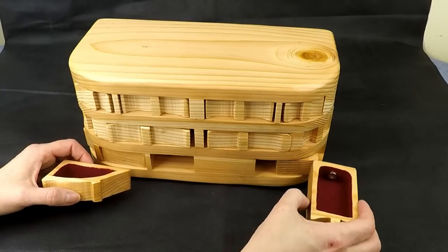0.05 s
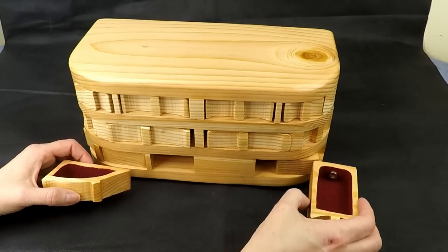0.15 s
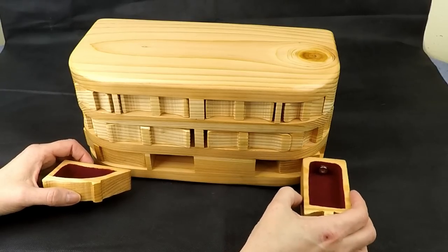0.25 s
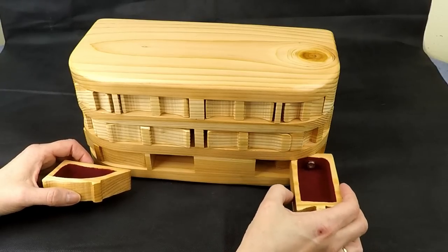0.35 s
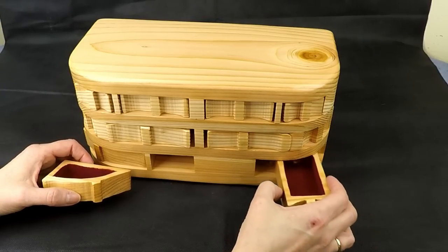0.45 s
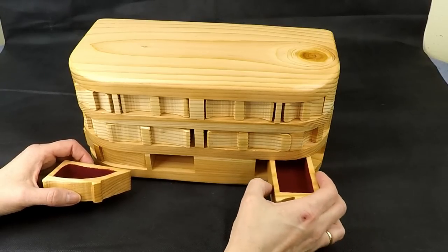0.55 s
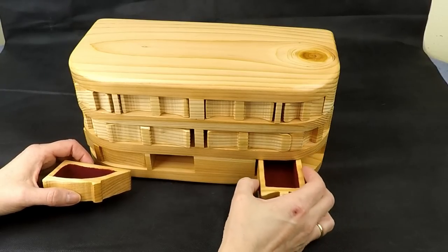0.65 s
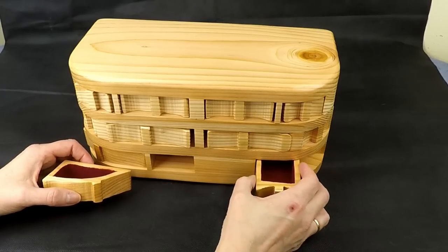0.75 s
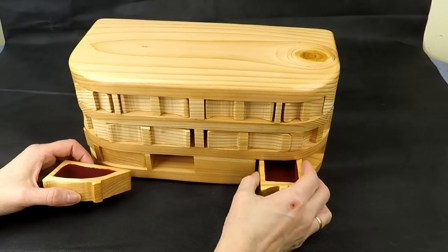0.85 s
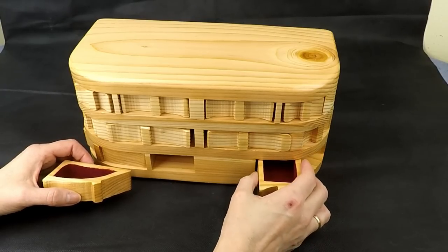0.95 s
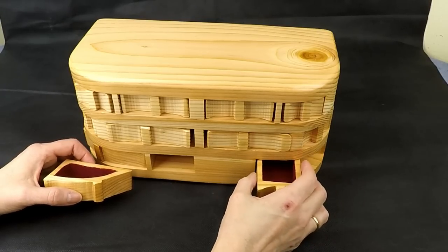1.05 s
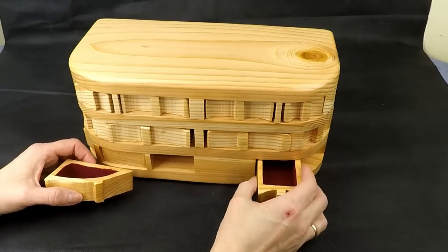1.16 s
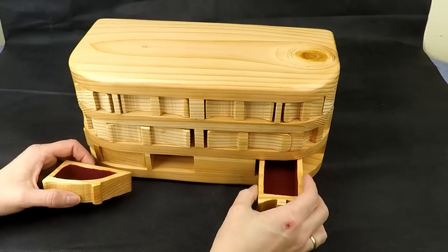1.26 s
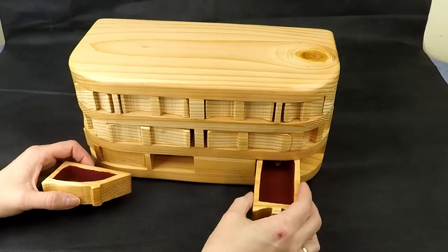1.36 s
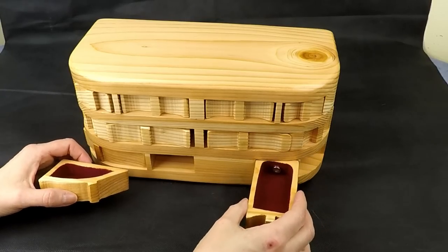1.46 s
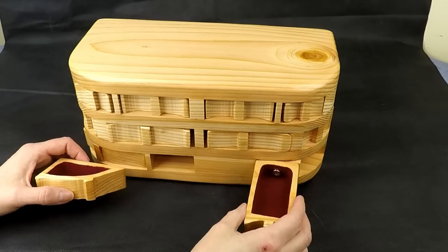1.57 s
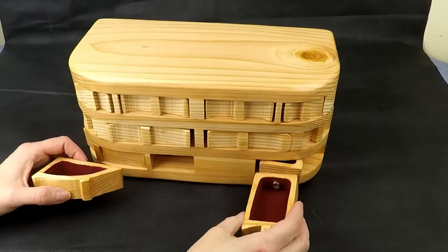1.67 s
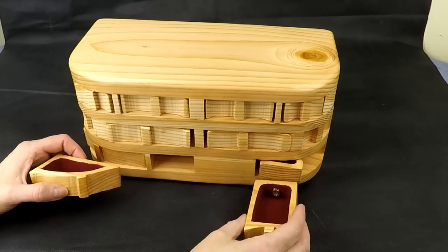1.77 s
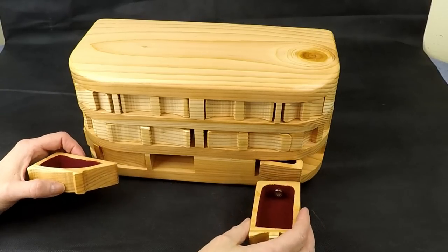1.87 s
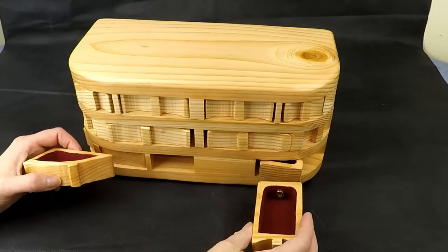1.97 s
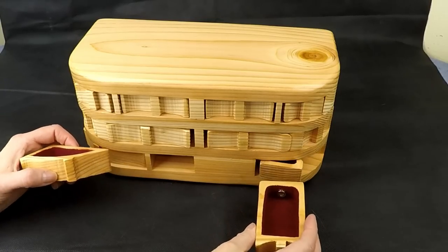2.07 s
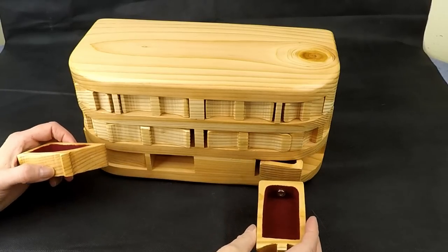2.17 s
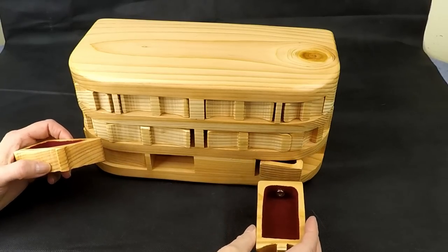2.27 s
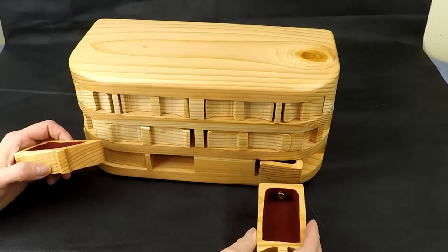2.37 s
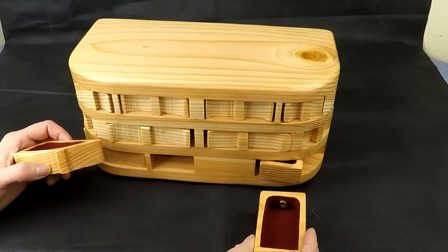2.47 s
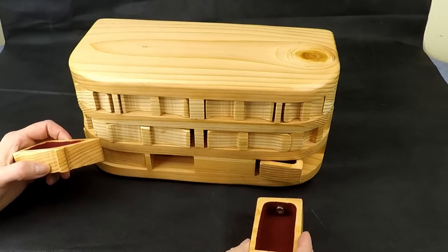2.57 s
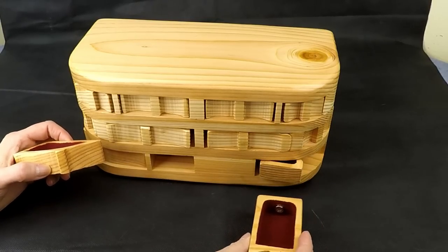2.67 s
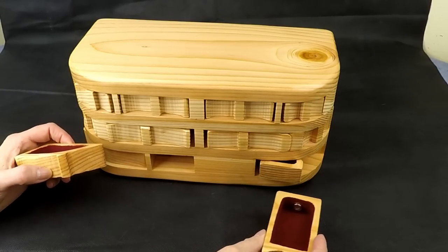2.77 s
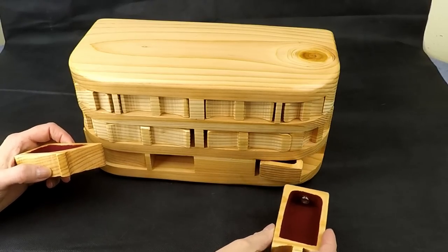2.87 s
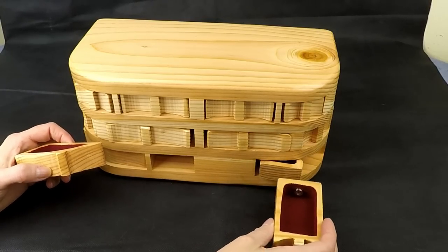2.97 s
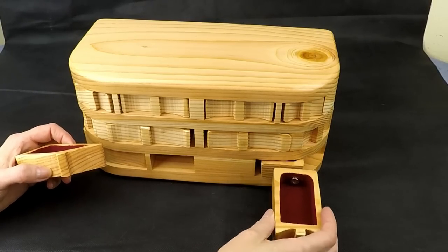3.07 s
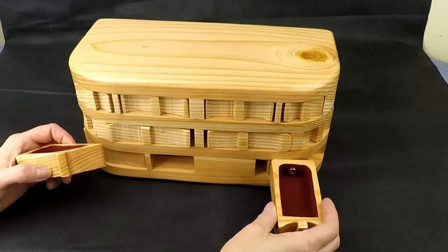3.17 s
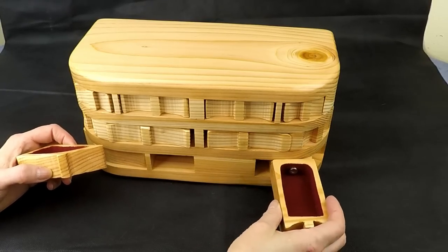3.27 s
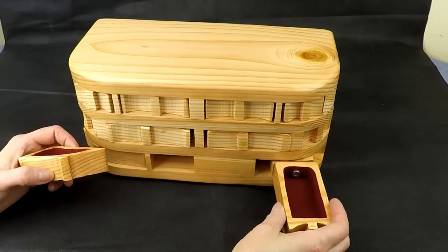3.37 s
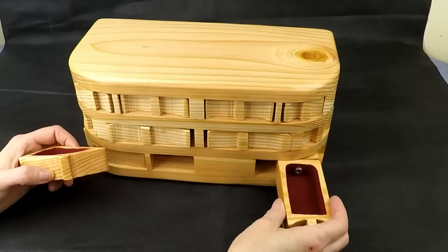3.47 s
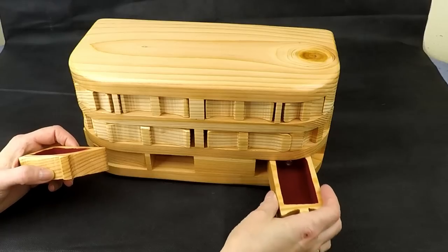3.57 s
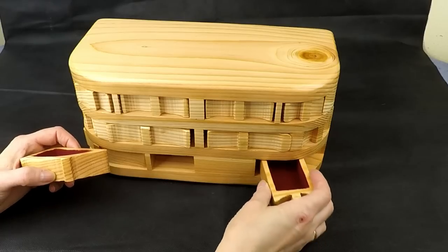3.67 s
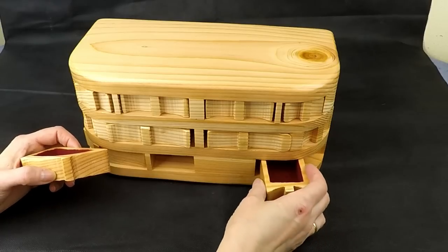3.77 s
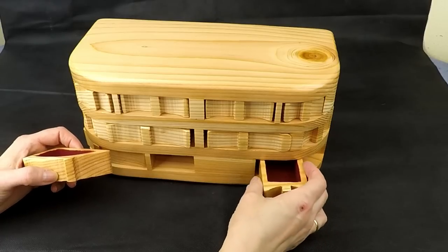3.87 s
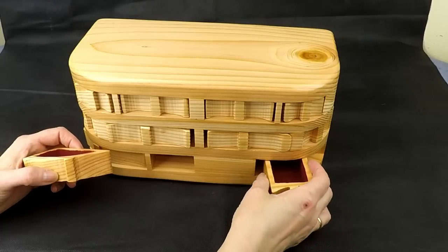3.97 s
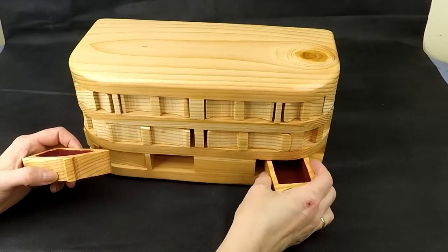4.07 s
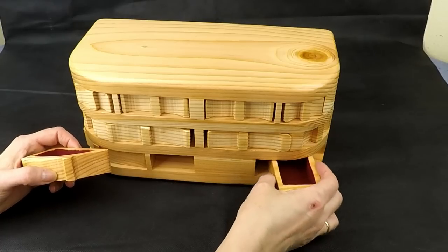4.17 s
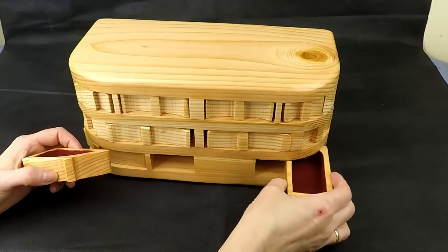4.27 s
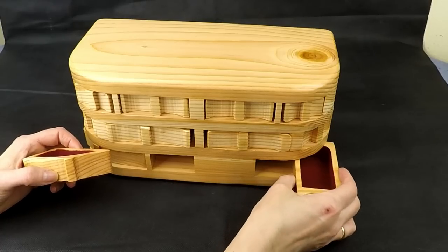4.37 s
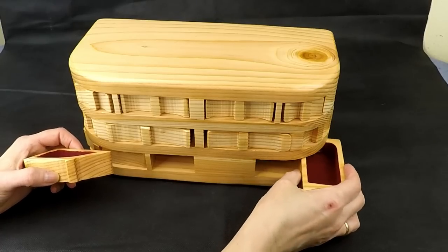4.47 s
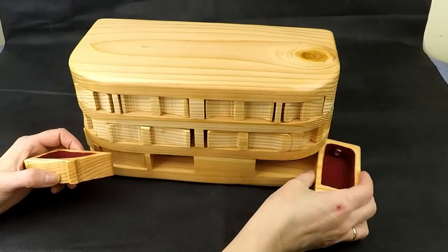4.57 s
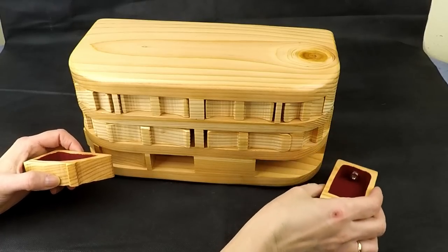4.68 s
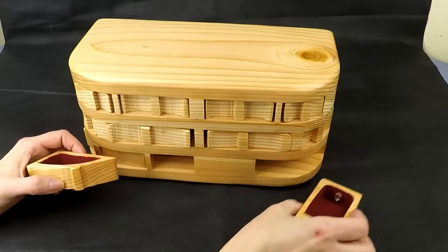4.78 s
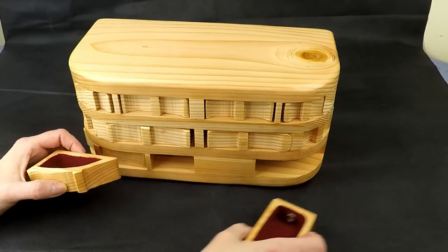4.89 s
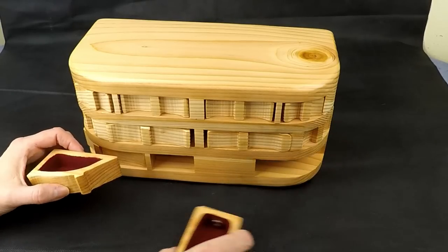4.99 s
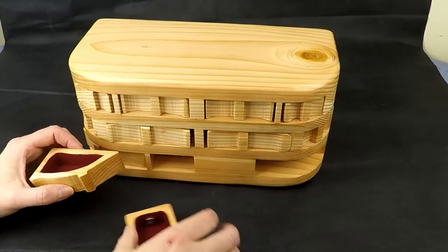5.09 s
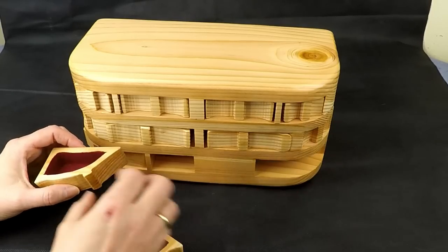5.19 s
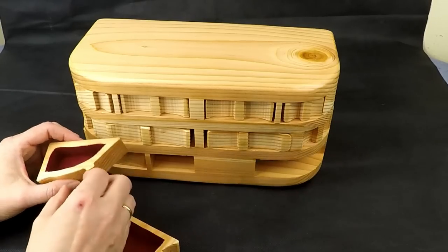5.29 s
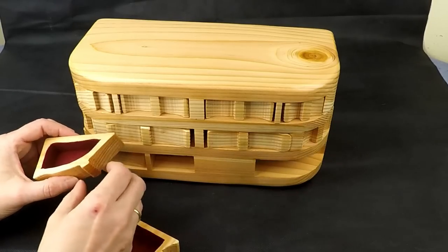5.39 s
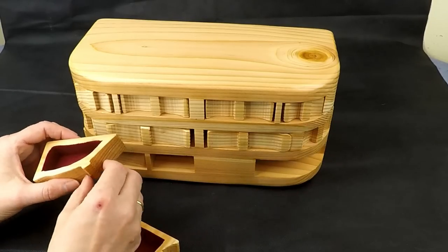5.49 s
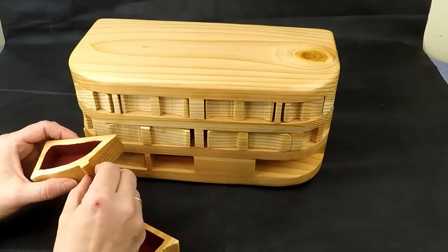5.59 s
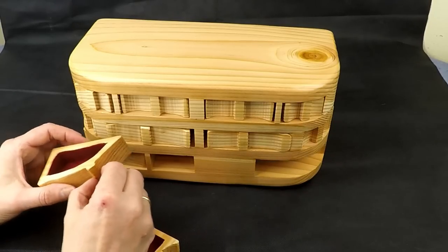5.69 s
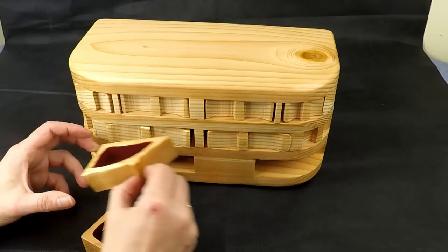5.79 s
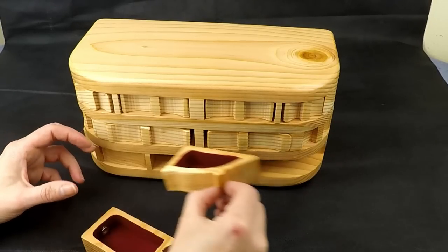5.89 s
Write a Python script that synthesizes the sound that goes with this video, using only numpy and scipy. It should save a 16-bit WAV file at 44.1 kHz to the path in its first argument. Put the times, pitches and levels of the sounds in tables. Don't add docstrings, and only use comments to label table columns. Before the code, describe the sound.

Close, dry handling of a small wooden drawer at a hollow pine chest on a cloth-covered table, with soft dark microphone hiss throughout. From about 0.1 s it goes in with uneven scrapes, small ticks and hollow knocks, the hardest clacks near 0.46 and 0.62-0.65 s, then lighter taps until 1 s. Between 1.15 and 1.7 s it is drawn out with a smoother, slightly humming rub and a few knocks. A near-silent gap follows, with only faint cloth rustle. At 3.07 s a sharp clack starts a second, louder push: dense rattles and scrapes, peaking at 3.65-3.69 s, with low table thumps and another hard knock at 3.96 s. A brisk pull scrapes from 4.18 to 4.6 s. Cloth rustles around 4.8 s, a soft table thud at 5.0 s, a bright short metal clink at 5.26 s, and faint metallic scratches near 5.53 s. Very little room echo.

```python
import sys
import numpy as np
from scipy import signal
from scipy.fft import rfft, irfft, next_fast_len
from scipy.io import wavfile
from scipy.ndimage import uniform_filter1d

SR = 44100
rng = np.random.default_rng(int(sys.argv[2]) if len(sys.argv) > 2 else 0)


def voltage_ratio(decibels):
    exponent = np.asarray(decibels, float) / 20
    return 10 ** exponent


def int16_out(signal):
    q = np.round(np.clip(np.atleast_2d(signal).T, -1, 1) * 32767)
    wavfile.write(sys.argv[1], SR, q.astype(np.int16))


N = 261674

# frequency in Hz, width in Hz, level in dB.
WOOD_MODES = [(646, 113, 1), (793, 23.5, -3.5), (1077.5, 40, -3.5), (1510, 106, -4), (1680, 48, 0),
              (2030, 77, 0.5), (2575, 38, -2), (2770, 62, -3), (3220, 170, -5.5), (3853, 93, -9.5),
              (4350, 69, -9.5), (5120, 180, -12.5), (6230, 160, -16.5), (7060, 440, -13.5)]
MODE_GROUPS = np.array([[1350, 2300], [400, 1350], [2300, 4600], [4600, 12000]])

# start in seconds, length in seconds, middle modes in dB,
# cavity share in dB, bright share in dB.
FIRST_PUSH = [(0.13, 0.11, -66, 17, -3), (0.195, 0.029, -40, 3.5, 3.5), (0.24, 0.012, -36, 2.5, -17),
              (0.272, 0.093, -40.5, -12, 2.5), (0.325, 0.01, -44.5, 13, 4), (0.36, 0.045, -47, 14, -12),
              (0.405, 0.044, -36.5, 4, -1.5), (0.475, 0.0087, -27, -21, 1), (0.505, 0.063, -41.5, 3, 3),
              (0.59, 0.016, -28, -5.5, -1.5), (0.622, 0.019, -32, 2, -2), (0.645, 0.0069, -26, 12.5, -11),
              (0.67, 0.093, -33.5, -3, -5.5), (0.74, 0.031, -38, -1, 3), (0.8, 0.055, -60, -3, -11),
              (0.88, 0.078, -53, 8, 4)]
FIRST_PULL = [(1.151, 0.084, -42, 0.5, -8), (1.193, 0.11, -41.5, -0.5, -8), (1.25, 0.057, -38, -10, -11),
              (1.311, 0.1, -38.5, -3, -8.5), (1.42, 0.038, -45.5, 2, 0), (1.46, 0.03, -46.5, 3, -5),
              (1.5, 0.03, -54, 8, -4), (1.542, 0.06, -53.5, 5.5, -5), (1.599, 0.022, -38, -1.5, -11),
              (1.634, 0.014, -34.5, -1, -7), (1.664, 0.0064, -39.5, 0, 6.5), (1.69, 0.026, -61, 3, -5)]
SECOND_PUSH = [(3.08, 0.049, -34, -7, -7), (3.14, 0.034, -40.5, 9.5, 4), (3.17, 0.04, -34.5, -14, -12),
               (3.29, 0.013, -58, 24, -4), (3.382, 0.028, -35.5, 2, -14), (3.451, 0.0055, -33.5, 1, -5),
               (3.472, 0.013, -29.5, 2, -1.5), (3.494, 0.059, -22.5, -3.5, -3.5),
               (3.565, 0.072, -29.5, 0.5, -4), (3.601, 0.027, -25.5, -1.5, 1.5), (3.66, 0.043, -22, 4, 0),
               (3.699, 0.036, -37, 14.5, 10), (3.735, 0.025, -37.5, 5, 3), (3.91, .03, -48, -6, -17),
               (3.948, 0.013, -29.5, -11, 1), (3.976, 0.032, -29.5, 0.5, -23), (4.01, 0.047, -47, 0, 0),
               (4.07, 0.039, -49, 0, 1)]
SECOND_PULL = [(4.176, 0.042, -26, -10, -5), (4.214, 0.041, -22, -22, -11.5),
               (4.266, 0.031, -25.5, -8, -10), (4.31, 0.062, -31.5, -8.5, -10),
               (4.385, 0.081, -29, -12, -12), (4.503, 0.023, -27, -7, -8.5),
               (4.535, 0.034, -26.5, -8.5, -6), (4.578, 0.037, -27.5, -10, -10.5)]
# time in seconds, resonance in Hz.
SLOT_AIR = [(1.15, 1700), (1.5, 1690), (1.6, 1590), (1.66, 1680), (4.18, 1660), (4.25, 1670), (4.3, 1636),
            (4.37, 1500), (4.46, 1580), (4.5, 1710), (4.62, 1630)]
# time in seconds, resonance in Hz.
DRAWER_HUM = [(1.15, 700), (1.3, 710), (1.36, 775), (1.62, 708), (4.2, 800), (4.3, 794), (4.45, 790),
              (4.55, 754), (4.62, 650)]
# start in seconds, length in seconds, share in dB.
BOTTOM_PANEL = [(1.15, 0.15, -3), (1.38, 0.12, 1.5), (1.6, 0.065, -3), (4.18, 0.093, -2),
                (4.51, 0.081, -2.5)]

# time in seconds, peak in dB, cavity share in dB,
# bright share in dB, low ring of the spot in Hz.
ON_FLOOR = [(0.787, -15.5, 5, -30, 744), (0.932, -11.5, -1.5, -25, 835), (3.223, -14, 5, -11, 890),
            (3.753, -13, -4, -13, 1200), (4.471, -15.5, 13, -34, 830)]
ON_FRONT = [(0.233, -14.5, 6, -4, 467), (0.271, -17, 4, -3, 1060), (0.338, -11.5, 10, -6, 830),
            (0.388, -12.5, 14, -14, 814), (0.59, -15, 8, -20, 725), (0.6165, -0.5, 0, -4.5, 700),
            (1.412, -16, 6, -14, 740), (1.436, -17, -34, -2, 832), (3.171, -15.5, 16, -11, 454),
            (3.389, -15, -4, -7.5, 1040), (3.495, -23, -6, -26, 780), (3.519, -12, -11, -35, 1090),
            (3.537, -5.5, -7.5, -41, 834), (3.832, -21, 2, -14, 670), (4.215, -33, -28, -4, 1350)]
ON_SIDE = [(0.265, -16.5, 4, -20, 900), (0.527, -9, -2.5, -18, 1080), (1.451, -15, -1.5, -27, 800),
           (3.132, -10, -1, -14, 910)]
ON_RAIL = [(1.663, -19, 4.5, -5, 970), (3.066, -4, -0.5, -6.5, 1120), (4.177, -9, -9, -31, 1180)]
ON_CORNER = [(0.134, -25, 3, -19, 950), (0.185, -27, 8, -21, 935), (0.628, -4.5, -19, -12, 705),
             (0.64, 4, -11, -6, 1180), (0.742, -12.5, 2, -30, 590), (0.981, -30.5, 7, -26, 756),
             (3.2802, -11.5, 0, -3, 890), (3.463, -14.5, -4, -40, 905), (3.689, 5.5, -8, -9, 1510)]
ON_LIP = [(0.461, -3.5, 6.5, -14, 770), (3.962, -2, -1.5, -16, 1500)]
ON_EDGE = [(3.64, -11, 4, -10, 678), (3.65, 7.5, -10, -3, 820), (3.656, 6, -5, -0.5, 1175)]

# time in
# seconds, peak in dB, ring in Hz, second ring in Hz, decay in ms.
TICKS = [(0.197, -25, 910, 2640, 3.7), (0.22, -23.5, 2700, 950, 3.5), (0.272, -25, 3880, 1830, 4.5),
         (0.297, -24, 900, 1690, 4.4), (0.325, -26, 3910, 1750, 8), (0.235, -19, 332, 1640, 1.9),
         (0.2645, -28, 900, 1100, 3.5), (0.339, -24, 3220, 1060, 3.3), (0.342, -17, 855, 1010, 8.1),
         (0.392, -18, 845, 1650, 9), (0.441, -24, 813, 1900, 2.7), (0.46, -8, 3080, 5150, 1.2),
         (0.47, -14, 866, 2950, 8.3), (0.488, -20, 814, 2800, 4.6), (0.528, -15, 1930, 1910, 4.3),
         (0.556, -27, 726, 1700, 4.1), (0.598, -19, 1650, 704, 3.3), (0.635, -19, 2580, 1700, 1.6),
         (0.646, -5.5, 1360, 2230, 2), (0.654, -10, 1770, 1110, 2.7), (0.63, -12, 2600, 1800, 2),
         (0.6165, -5.5, 1880, 2900, 1.5), (0.6402, -10, 2540, 3980, 1.2),
         (1.437, -17, 2600, 4350, 3.3), (1.664, -18.5, 2570, 2080, 8.8),
         (1.672, -19.5, 2550, 2130, 7.5), (1.68, -23, 2560, 2150, 7), (1.788, -34.5, 4900, 6960, 2.3),
         (3.066, -5, 2543, 2210, 4.2), (3.072, -21, 2650, 895, 2.4), (3.094, -16, 2560, 1680, 2.4),
              (3.135, -13.5, 2700, 3800, 3), (3.1328, -9.5, 960, 1800, 2.7), (3.223, -30, 4270, 2580, 3.3),
              (3.2231, -20, 970, 1500, 2.1), (3.282, -23, 5540, 7900, 2), (3.2811, -18.5, 2550, 980, 3.8),
              (3.453, -17, 960, 1710, 3.3), (3.463, -12, 2260, 1040, 2.7), (3.48, -29, 1000, 2500, 2),
              (3.49, -19, 1120, 2370, 2.7), (3.502, -27, 2600, 806, 2), (3.523, -21, 1680, 2550, 3.5),
              (3.544, -12, 2580, 1710, 2), (3.567, -17, 1700, 790, 6.7), (3.612, -28, 800, 1710, 3),
              (3.618, -14, 1740, 895, 2.8), (3.6414, -14, 2600, 6000, 1.6), (3.65, 4.5, 5330, 4740, 0.87),
              (3.692, -3, 4540, 1690, 1.2), (3.691, -5.5, 1630, 2300, 3.6),
         (3.962, -3, 2970, 2040, 1.7), (3.963, -11.5, 6300, 4530, 0.25), (3.967, -7, 1500, 835, 1.4),
              (3.971, -8, 2350, 1390, 2.5), (3.975, -17, 2900, 1400, 2), (4.185, -7, 2080, 1590, 2.3),
              (4.207, -10, 2500, 1690, 2.5), (4.219, -18, 1680, 2050, 4), (4.245, -22, 1710, 2130, 3.5),
              (4.286, -16.5, 776, 1730, 3.9), (4.368, -33, 1550, 2150, 2.7), (4.386, -27, 1500, 2170, 3),
              (4.472, -18, 1126, 482, 5), (4.476, -19, 860, 1470, 6.5), (4.498, -18, 1640, 1240, 2.4),
              (5.2565, -25, 3300, 2440, 4.1), (5.268, -30, 3780, 3100, 3), (5.273, -20, 3000, 8200, 3),
              (5.292, -29, 2960, 7570, 4.6), (5.284, -24, 2800, 7300, 3.6), (5.308, -37, 2920, 7200, 3),
              (5.318, -33, 2680, 2830, 4.4), (5.33, -37, 2780, 3700, 3), (5.34, -42, 2750, 7200, 20),
              (5.355, -37, 9900, 11500, 2)]

# time in seconds, peak in dB, scratch share in dB.
CLINKS = [
    (5.012, -28.5, 0),
    (5.2561, -12, 3),
    (5.267, -17, 9),
    (5.518, -31.5, 26),
    (5.536, -23, 19),
    (5.545, -27, 26),
    (5.557, -26.5, 22),
]
# frequency in Hz, level in dB, 60 dB decay time in seconds.
METAL_MODES = [(1500, -26, 0.0025), (2070, -8, 0.026), (2780, 8, 0.012), (2670, 7.5, 0.027),
               (2640, -10, 0.14), (3320, -4, 0.044), (3840, -4, 0.048), (4610, -30, .01),
               (6200, -4, 0.0091), (7150, 6, 0.01), (8200, 1.5, 0.02), (10200, -9, 0.0054),
               (13100, 0, .006)]

# time in seconds, peak in dB, ring in Hz.
THUDS = [(0.233, -28, 297), (0.24, -28.5, 150), (0.261, -31, 70), (0.526, -32, 470), (0.636, -20, 392),
         (0.747, -32, 152), (1.444, -36.5, 203), (1.884, -44, 158), (3.17, -30, 480), (3.177, -19.5, 468),
         (3.277, -31, 405), (3.646, -17.5, 520), (3.689, -21.5, 155), (3.722, -21.5, 440),
         (3.958, -22, 458), (3.965, -34, 284), (4.472, -37, 156), (4.818, -41, 225), (5.006, -33, 220)]
# start in seconds, length in seconds, legs in dB, top in dB.
SHOVES = [(0.0, 0.025, -49, -74), (0.245, 0.02, -41, -35), (0.45, 0.12, -54, -39), (0.64, 0.018, -33, -33),
          (0.78, 0.012, -60, -35), (0.87, 0.053, -35.5, -66), (1.17, 0.1, -61, -49),
          (1.42, 0.024, -40, -44), (1.87, 0.016, -39.5, -54), (3.18, 0.019, -48, -44.5),
          (3.45, 0.075, -36.5, -37.5), (3.64, 0.075, -40, -31), (3.77, 0.03, -30, -41),
          (3.96, 0.032, -33, -48), (4.47, 0.047, -37.5, -54), (4.8, 0.043, -39, -41.5),
          (4.99, 0.047, -48, -44), (5.55, 0.047, -50, -81)]
# time in seconds, level in dB.
SWAY = [(0, -44), (0.45, -38), (0.69, -28.5), (1.06, -27), (1.19, -36), (1.4, -27), (1.91, -31),
        (2.2, -30.5), (2.4, -39.5), (2.8, -32), (3.1, -40), (3.27, -18.5), (3.5, -37), (4.0, -29),
        (4.43, -24), (4.71, -18), (5.15, -43), (5.61, -24.5)]

# start in seconds, length in seconds, fine threads in dB, wood drag in dB.
RUBS = [(0.78, 0.019, -66, -27), (0.825, 0.013, -48.5, -34), (2.4, 0.15, -54.5, -70),
        (2.8, 0.46, -55.5, -69), (3.885, 0.029, -50, -57), (3.925, 0.039, -53, -36),
        (4.65, 0.085, -51, -51), (4.78, 0.11, -43.5, -32.5), (4.9, 0.072, -49, -51), (5.0, 0.035, -41, -36),
        (5.06, 0.08, -45.5, -43), (5.17, 0.058, -50.5, -45), (5.27, 0.019, -49, -56),
        (5.33, 0.02, -54, -62), (5.455, 0.093, -56, -42.5), (5.515, 0.037, -54, -58)]
# frequency in Hz, level in dB per Hz.
THREAD_COLOUR = [(1470, -41), (2500, -5.5), (2930, -7), (3230, -7), (3880, -5), (8930, -9.5), (15300, -23)]
# start in seconds, length in seconds, level in dB.
WHISPERS = [
    (0.82, 0.023, -49),
    (3.715, 0.023, -51),
    (3.89, 0.037, -49.5),
]
# frequency in Hz, level in dB per Hz.
HISS_COLOUR = [(35, 1.5), (60, 0.5), (98, -3.5), (174, -5.5), (441, -7.5), (685, -11), (1610, -12.5),
               (15300, -24)]

RUB_RISE_DB_S, RUB_FALL_DB_S, LIFT_DB_S = 302, 261, 1100.
PUSH_TOP_DB, PULL_TOP_DB = -4.5, 4.5


def scrape():
    t = np.arange(N) / SR
    first_pull = (t > FIRST_PULL[0][0] - .05) & (t < SECOND_PUSH[0][0] - .05)
    pulling = first_pull | (t > SECOND_PULL[0][0] - .05)
    grip = voltage_ratio(np.where(pulling, 1.2, 2.4) * walk(60))
    force = slips(6000, 1.2) * grip
    middle, cavity, wall, top = grain_modes(force)

    slot = unit(glide(force, np.interp(t, *np.transpose(SLOT_AIR)), 200.))
    rail = unit(ring(ring(force, 1990, 220), 2120, 120))
    rough_rail = unit(ring(force, 1850, 700))
    middle = unit(middle) + pulling * (voltage_ratio(-1.) * slot + voltage_ratio(-8.) * rail) + voltage_ratio(-4) * rough_rail

    hum = unit(glide(force, np.interp(t, *np.transpose(DRAWER_HUM)), 130.))
    panel = unit(ring(ring(force, 511, 180), 511, 210))
    panel_gain = curve(BOTTOM_PANEL, np.transpose(BOTTOM_PANEL)[2], RUB_RISE_DB_S, RUB_FALL_DB_S)
    cavity = unit(np.where(pulling, band(cavity, 596, 1700), cavity))
    cavity = cavity + pulling * voltage_ratio(1.) * hum + panel_gain * panel

    wall = unit(wall) + pulling * voltage_ratio(4.) * unit(ring(force, 3250, 1300))

    fine_fibres = unit(ring(slips(11000, 0.45) * grip, 5360, 1760))
    thin_wall = unit(ring(ring(force, 8070, 500), 9000, 330))
    top = top + voltage_ratio(-1.0) * fine_fibres + voltage_ratio(-11.0) * thin_wall
    top = top * voltage_ratio(np.where(pulling, PULL_TOP_DB - PUSH_TOP_DB, 0))

    strokes = FIRST_PUSH + FIRST_PULL + SECOND_PUSH + SECOND_PULL
    db, cavity_db, bright_db = np.transpose(strokes)[2:]
    levels = db, db + cavity_db, db + bright_db, db + bright_db + PUSH_TOP_DB
    out = np.zeros(N)
    for part, level, (lo_hz, hi_hz) in zip((middle, cavity, wall, top), levels, MODE_GROUPS):
        gain = curve(strokes, level, 1300., LIFT_DB_S, after_db=-11, after_fall=237)
        out += gain * unit(band(part, .9 * lo_hz, 1.1 * hi_hz))
    return out


def grain_modes(force):
    parts = np.zeros((4, N))
    for hz, width, db in WOOD_MODES:
        mode = unit(ring(ring(force, hz, 7.1 * width), hz, 1.6 * width))
        patch_db = 3.3 * walk(22)
        for part, (lo_hz, hi_hz) in zip(parts, MODE_GROUPS):
            if lo_hz <= hz < hi_hz:
                part += voltage_ratio(db + patch_db) * mode
    return parts


def knocks():
    out, t = np.zeros(N), np.arange(4096) / SR
    u = t[:1024]
    hz, width, db = np.transpose(WOOD_MODES)
    damping = np.exp(-np.pi * 1.8 * np.r_[width, 70, 120, 2500][:, None] * u)
    spots = ((ON_FLOOR, 1500), (ON_FRONT, 1680), (ON_SIDE, 1820), (ON_RAIL, 2100),
             (ON_CORNER, 2600), (ON_LIP, 3170), (ON_EDGE, 3840))
    blows = [(*row, high_hz) for rows, high_hz in spots for row in rows]
    for s, peak_db, cavity_db, bright_db, low_hz, high_hz in blows:
        level_chance, pitch_chance = rng.standard_normal((2, len(hz)))
        share_db = np.where(hz < 1350, cavity_db - 0.5, np.where(hz > 3000, bright_db + 10, 0))
        wood_db = db + share_db + 1.5 * level_chance
        gain = voltage_ratio(np.r_[wood_db, cavity_db + 9, 8, bright_db + 2])
        tone_hz = np.r_[hz * (1 + .015 * pitch_chance), low_hz, high_hz, 7500][:, None]
        modes = damping * np.sin(2 * np.pi * tone_hz * u)
        contact_ms = max(6.5 + 0.16 * peak_db, 1)
        body = gain @ rattle(t, modes, contact_ms, rng.standard_normal((len(gain), len(t))))
        edge_hz = 0.87 * min(low_hz, 800)
        top_hz = np.clip(16000 * voltage_ratio(.4 * bright_db), 2800, 12000)
        body = band(band(body, edge_hz, top_hz), edge_hz, top_hz)
        fade = np.minimum((t[-1] - t) / 0.012, 1)
        add(out, s + .001, peak_db, body * fade)
    return out


def rattle(t, modes, ms, noise):
    decay = np.exp(-t / (ms / 2000)) + voltage_ratio(-17.0) * np.exp(-t / 0.035)
    contact = (1 - np.exp(-t / 0.000048)) * decay
    strike = 2.83 * np.sin(np.pi * np.minimum(t / 0.000093, 1))
    rung = signal.fftconvolve(modes, contact * noise + strike, axes=1)[:, :len(t)]
    return rung / np.abs(rung).max(axis=1, keepdims=True)


def ticks():
    out, t = np.zeros(N), np.arange(2048) / SR
    for s, peak_db, hz, second_hz, ms in TICKS:
        low_hz, high_hz = min(hz, second_hz), max(hz, second_hz)
        tones = np.sin(2 * np.pi * hz * t) + 0.64 * np.sin(2 * np.pi * second_hz * t)
        rings = np.exp(-t * 1000 / ms) * tones
        push = np.sin(np.pi * np.minimum(t * 2.5 * high_hz, 1))
        roughness = .1 * rng.standard_normal(len(t)) * np.exp(-t / .0012)
        body = signal.fftconvolve(rings, push + roughness)[:len(t)]
        add(out, s, peak_db, band(body, 0.6 * low_hz, 1.74 * high_hz))
    return out


def clinks():
    out, t = np.zeros(N), np.arange(4096) / SR
    hz, db, t60 = (column[:, None] for column in np.transpose(METAL_MODES))
    modes = np.exp(-np.log(1000) * t / t60) * np.sin(2 * np.pi * hz * t)
    for s, peak_db, scratch_db in CLINKS:
        metal = voltage_ratio(db[:, 0]) @ rattle(t, modes, 7., rng.standard_normal((len(hz), len(t))))
        scratch = voltage_ratio(scratch_db - 10.0) * np.exp(-t / 0.0075) * rng.standard_normal(len(t))
        add(out, s, peak_db, band(metal + scratch, 330, 10400))
    return out


def thuds():
    out, t = np.zeros(N), np.arange(int(.2 * SR)) / SR
    for s, peak_db, hz in THUDS:
        decay = np.exp(-t * hz / 3.06)
        add(out, s, peak_db, (1 - np.exp(-t / 0.00085)) * decay * np.sin(2 * np.pi * hz * t))
    return out


def table():
    t = np.arange(N) / SR
    sway = np.sqrt(2) * np.sin(2 * np.pi * 11.4 * t) * voltage_ratio(np.interp(t, *np.transpose(SWAY)))
    shake = rng.standard_normal(N)
    legs = ring(ring(shake, 47.6, 6.0), 36, 42)
    legs += 0.22 * ring(ring(shake, 62, 40), 83, 26)
    legs += 0.3 * ring(ring(shake, 27, 11), 29, 12)
    top = ring(ring(shake, 110.6, 16.0), 105.0, 56)
    top += 0.5 * ring(ring(shake, 146.0, 28.0), 117.5, 34)
    top += 0.31 * ring(ring(shake, 125, 187), 130, 430)
    legs_gain, top_gain = (curve(SHOVES, db, 365, 159) for db in np.transpose(SHOVES)[2:])
    return sway + (legs_gain + voltage_ratio(-49)) * unit(legs) + (top_gain + voltage_ratio(-58)) * unit(top)


def cloth():
    brush = voltage_ratio(2.0 * walk(30)) * slips(5500, 0.26)
    threads, drag = (curve(RUBS, db, RUB_RISE_DB_S, RUB_FALL_DB_S) for db in np.transpose(RUBS)[2:])
    return threads * voltage_ratio(2.5) * colour(brush, THREAD_COLOUR) + drag * voltage_ratio(-12.5) * unit(band(brush, 770, 2540))


def whispers():
    slip = ring(ring(rng.standard_normal(N), 9000, 1500), 9000, 1500)
    return curve(WHISPERS, np.transpose(WHISPERS)[2], RUB_RISE_DB_S, LIFT_DB_S) * unit(slip)


def room(x):
    echoes = np.zeros(int(0.046 * SR))
    lags = rng.integers(200, len(echoes), size=14)
    echoes[lags] = rng.choice([-1, 1], size=14) * np.exp(-lags / (0.066 * SR))
    return ring(signal.fftconvolve(x, echoes)[:N], 1000, 1700)


def microphone_hiss():
    return voltage_ratio(-46.5 + .5 * walk(2.42)) * colour(rng.standard_normal(N), HISS_COLOUR)


def unit(x):
    return x / np.sqrt(np.mean(x ** 2))


def curve(rows, db, rise, fall, after_db=-60., after_fall=500.):
    t, power = np.arange(0, N, 64) / SR, 0
    for (s, length), top_db in zip(np.array(rows)[:, :2], db):
        late = np.maximum(t - s - length, 0)
        shape = voltage_ratio(-fall * late) + voltage_ratio(after_db - after_fall * late) * (late > 0)
        power = power + (voltage_ratio(top_db - rise * np.maximum(s - t, 0)) * shape) ** 2
    return np.interp(np.arange(N) / SR, t, np.sqrt(power))


def ring(x, hz, width):
    return signal.lfilter(*signal.iirpeak(hz, hz / width, fs=SR), x)


def glide(x, hz, width_hz):
    turn = np.exp(2j * np.pi * np.cumsum(hz) / SR)
    lowpass = signal.butter(2, width_hz / 2, fs=SR, output="sos")
    return np.real(turn * signal.sosfilt(lowpass, x / turn))


def band(x, lo_hz, hi_hz):
    return signal.sosfilt(signal.butter(2, [lo_hz, hi_hz], "bandpass", fs=SR, output="sos"), x)


def colour(x, points):
    hz, db = np.transpose(points)
    size = next_fast_len(len(x))
    f = np.maximum(np.arange(size // 2 + 1) * SR / size, 1)
    gain = voltage_ratio(np.interp(np.log(f), np.log(hz), db))
    return unit(irfft(rfft(x, size) * gain, size)[:len(x)])


def walk(rate):
    k = int(SR / rate)
    return uniform_filter1d(np.repeat(rng.standard_normal(N // k + 1), k), k)[:N]


def slips(rate, spread_db):
    clicks = (rng.random(N) < rate / SR) * rng.standard_normal(N)
    return unit(clicks * voltage_ratio(spread_db * rng.exponential(size=N)))


def add(out, s, peak_db, body):
    start = int(s * SR)
    out[start:start + len(body)] += voltage_ratio(peak_db) * body / np.abs(body).max()


def scene():
    blows = knocks() + clinks()
    wood = scrape() + blows + ticks() + voltage_ratio(-22.0) * room(blows)
    return (wood + thuds() + table() + cloth() + whispers() + microphone_hiss())[None]


def top_cut(x):
    return signal.sosfilt(signal.butter(12, 16450, fs=SR, output="sos"), x)


def record(dry):
    over = np.maximum(np.abs(dry) - .6, 0)
    held = signal.lfilter([1], [1, -np.exp(-1 / (.15 * SR))], over)
    ducked = dry / (1 + 0.0081 * held)
    soft = ducked / (1 + np.abs(ducked) ** 12) ** (1 / 12)
    cut = signal.sosfilt(signal.ellip(10, .2, 70, 15350, fs=SR, output="sos"), soft)
    return top_cut(voltage_ratio(-1.5) * cut)


dry = scene()
out = record(dry)
int16_out(out)
```